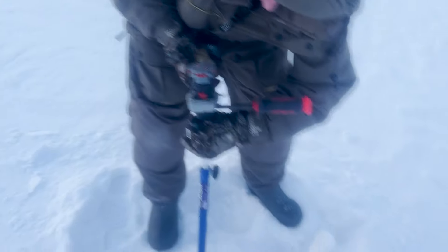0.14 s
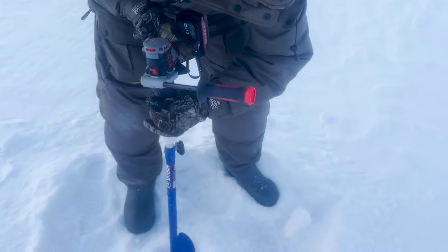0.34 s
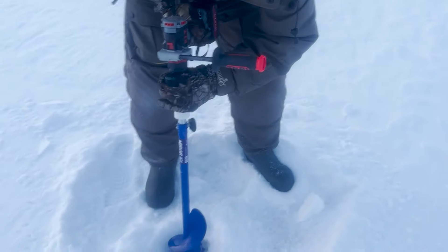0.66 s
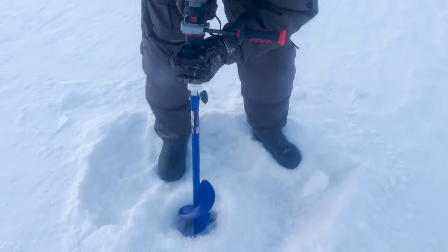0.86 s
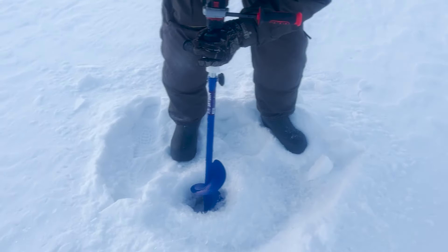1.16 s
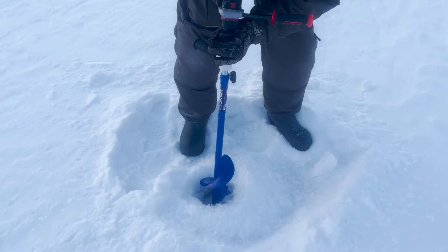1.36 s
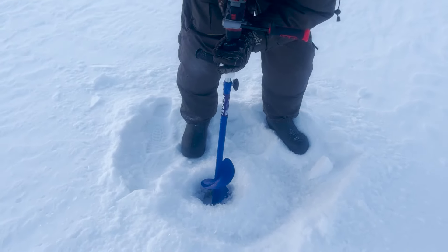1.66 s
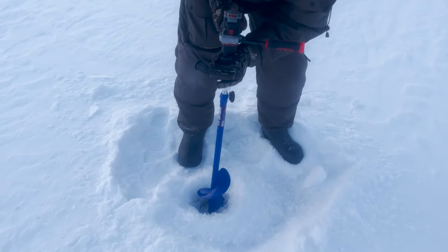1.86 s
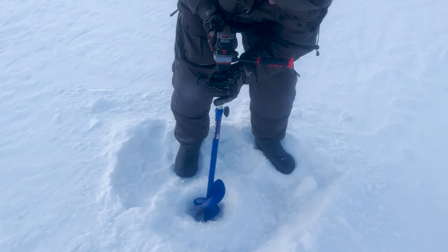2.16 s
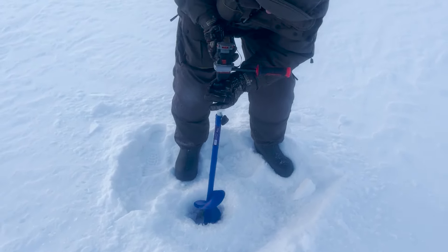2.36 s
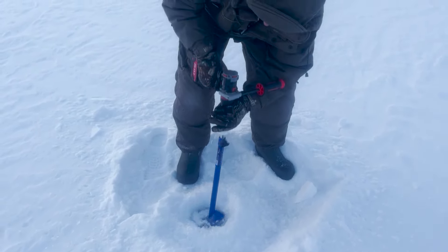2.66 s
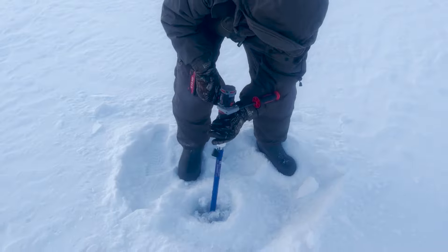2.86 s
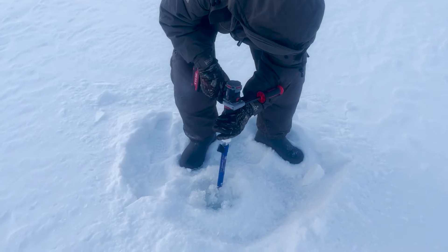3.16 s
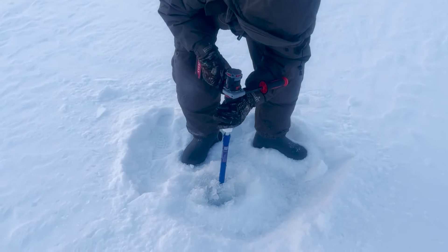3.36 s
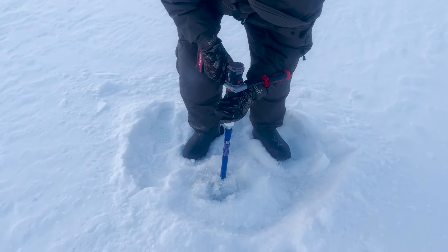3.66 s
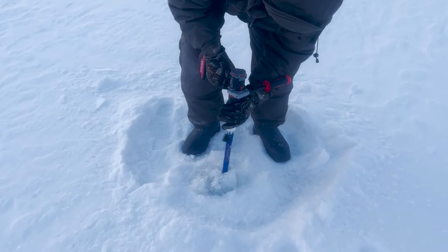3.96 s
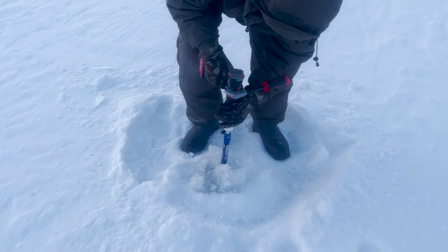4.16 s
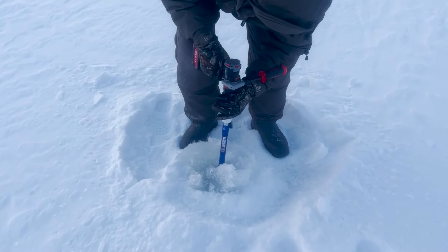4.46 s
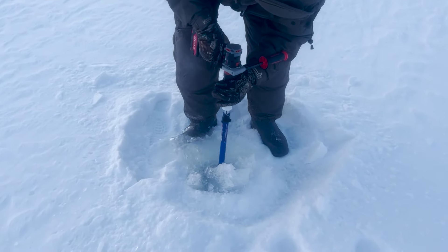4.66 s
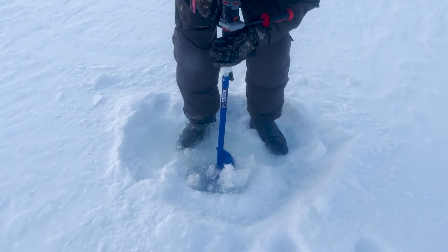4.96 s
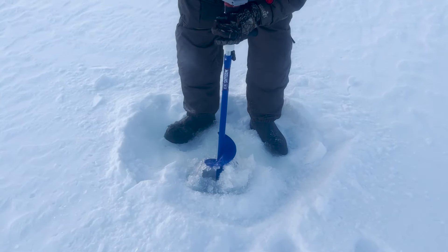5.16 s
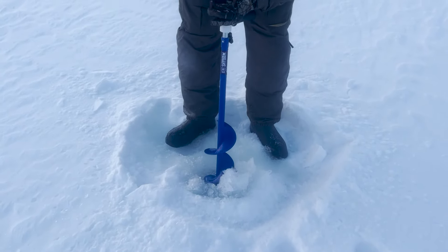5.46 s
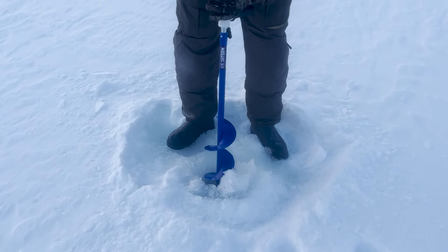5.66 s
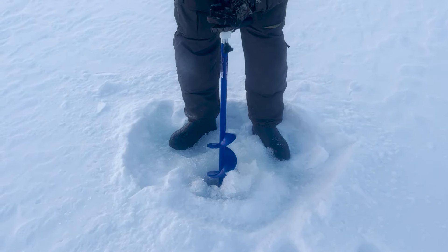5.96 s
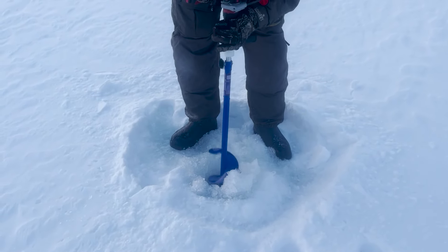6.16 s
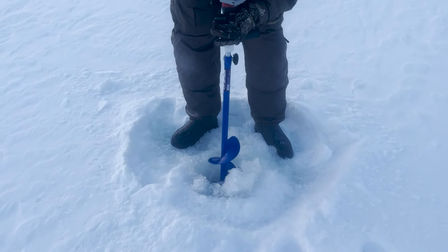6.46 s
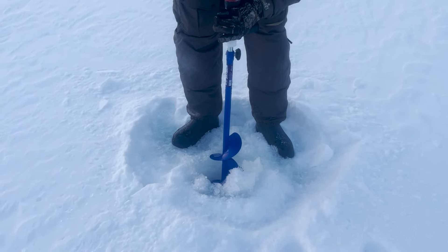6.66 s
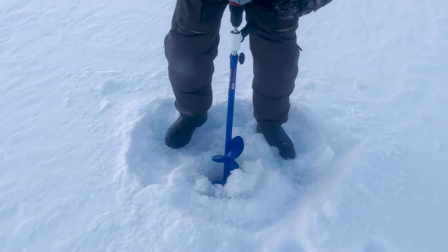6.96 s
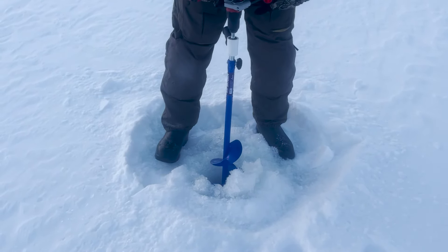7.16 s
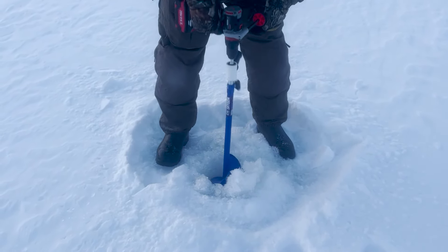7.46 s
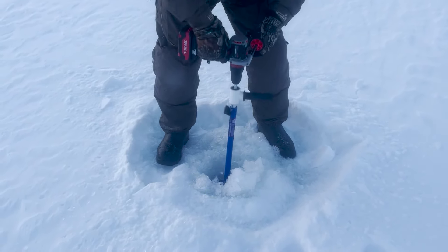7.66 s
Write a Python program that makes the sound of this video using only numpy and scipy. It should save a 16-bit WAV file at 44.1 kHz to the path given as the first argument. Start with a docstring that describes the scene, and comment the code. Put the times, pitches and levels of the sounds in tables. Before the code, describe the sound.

A cordless drill turns an auger into snow-covered ice in five bursts, the first already running at the start. Its high whine dips as the blades catch, with brittle crunching and hollow knocks from the hole. Between bursts come cloth and snow rustles, small ticks and a metallic clack. Low wind gusts and thumps buffet a close stereo microphone in a dry open place.

```python
"""Hand auger drilling lake ice

A cordless drill drives an auger into snow-covered ice in five short bursts, the first already under way.
Commutation pulses excite a housing resonance, and the whine sags as the load rises and the blades catch.
Random fractures make the ice crunch and excite the modes of the hole; shavings and cloth rustle in fine grains.
Low-frequency gusts and short eddy knocks buffet a two-port microphone in the open air."""
import sys
import numpy as np
from scipy import signal
from scipy.fft import rfft, irfft, next_fast_len
from scipy.io import wavfile

SR = 44100
rng = np.random.default_rng(int(sys.argv[2]) if len(sys.argv) > 2 else 0)


def wrap_up_sound(samples):
    """Save the sound to the file named by the first command line argument, as 16-bit audio."""
    columns = np.atleast_2d(samples).T
    # keep every value between -1 and 1, then stretch to whole-number steps
    tamed = np.clip(columns, -1, 1)
    steps = np.round(tamed * 32767).astype(np.int16)
    wavfile.write(sys.argv[1], SR, steps)


N = 344729
TIME = np.arange(N) / SR


def from_db(db):
    """Logarithmic level: 20 dB is a tenfold amplitude."""
    return 10 ** (np.asarray(db) / 20)


def rms_one(x):
    """Normalization to unit root-mean-square amplitude."""
    return x / np.sqrt(np.mean(x ** 2) + 1e-20)


def in_time(rows):
    """Linear interpolation: the columns of a curve at every sample."""
    s, *columns = np.transpose(rows)
    return [np.interp(TIME, s, c) for c in columns]


def at_hz(points, hz):
    """Interpolation of a spectrum on a log-frequency axis."""
    f, value = np.transpose(points)
    return np.interp(np.log(hz + 1), np.log(f), value)


def colour(x, spectrum):
    """Spectral shaping of a noise by multiplication in the frequency domain; rms 1."""
    size = next_fast_len(N)
    gain = from_db(at_hz(spectrum, np.fft.rfftfreq(size, 1 / SR)))
    return rms_one(irfft(rfft(x, size) * gain, size)[:N])


def band(x, low_hz, high_hz):
    """Band limiting by a second-order Butterworth design."""
    sections = signal.butter(2, [low_hz, min(high_hz, 20000)], "band", fs=SR, output="sos")
    return signal.sosfilt(sections, x + 1e-18)


def drift(rate):
    """Low-passed random modulation of unit rms, changing about `rate` times a second."""
    # filtered at a twentieth of the sample rate; the first 2000 values let the filter settle
    r = np.exp(-40 * np.pi * rate / SR)
    slow = signal.lfilter([1], [1, -2 * r, r * r], rng.standard_normal(N // 20 + 2002))[2000:]
    return np.interp(np.arange(N) / 20, np.arange(len(slow)), rms_one(slow))


def resonate(x, hz, width_hz):
    """Second-order resonance with about unit gain at its peak."""
    r = np.exp(-np.pi * width_hz / SR)
    zeros = np.array([1, 0, -1]) * (1 - r * r) / 2
    poles = [1, -2 * r * np.cos(2 * np.pi * hz / SR), r * r]
    return signal.lfilter(zeros, poles, x + 1e-18)


def gliding_resonance(x, hz, width_hz):
    """Heterodyne resonance: a one-pole low-pass in a frame that turns with the moving centre."""
    turn = np.exp(2j * np.pi * np.cumsum(hz) / SR)
    r = np.exp(-np.pi * width_hz / SR)
    return 2 * np.real(turn * signal.lfilter([1 - r], [1, -r], x / turn))


def ring(x, modes):
    """Modal superposition: a struck body as resonances in parallel."""
    # a 60 dB decay time sets the width of each mode
    return sum(from_db(db) * resonate(x, hz, np.log(1000) / (np.pi * t60)) for hz, db, t60 in modes)


def swells(events, rise_s, fall_s):
    """Transient envelope: each event rises and decays exponentially."""
    out, age = np.zeros(N), TIME[:SR // 4]
    shape = (1 - np.exp(-age / rise_s)) ** 2 * np.exp(-age / fall_s)
    for s, db in events:
        at = max(int(s * SR), 0)
        out[at:at + len(age)] += from_db(db) * shape[:N - at] / shape.max()
    return out


def holds(events, rise_s, fall_s):
    """Sustained envelope: each event ramps up, holds until its length is over and decays exponentially."""
    out = np.zeros(N)
    for s, length, db in events:
        rise = np.clip((TIME - s) / rise_s, 0, 1)
        fall = np.exp(-np.maximum(TIME - s - length, 0) / fall_s)
        out += from_db(db) * rise * fall
    return out


def grains(per_s, spread_db):
    """Impulsive noise: tiny events at random moments, with random signs and exponentially spread dB; rms 1."""
    sizes = from_db(spread_db * np.minimum(rng.exponential(1, N), 4)) * rng.choice([-1, 1], N)
    return rms_one(sizes * (rng.random(N) < per_s / SR))


# relative noise spectrum of the still air and of the breaking ice: frequency_hz, density_db [per Hz]
CRUNCH_SPECTRUM = [(150, -62), (300, 3), (600, 0.5), (1500, 3), (2200, -2), (3500, -4.5), (5000, -6.5),
                   (8000, -11), (12500, -12.5), (14200, -19), (15500, -39)]


def still_air():
    """Diffuse background: independent steady noise on each side."""
    return from_db(-61) * np.array([colour(rng.standard_normal(N), CRUNCH_SPECTRUM) for side in range(2)])


# gust level over time, before a small trim: start_s, level_db
WIND = [(0, -27.5), (.35, -31), (.7, -39), (.98, -37.5), (1.07, -49), (1.3, -41), (1.8, -43), (2.0, -40),
        (2.35, -53), (3.4, -38), (3.65, -47), (4.27, -38), (4.7, -51), (5.4, -48.5), (6.8, -42),
        (7.05, -47), (7.55, -39), (7.82, -44)]
# relative spectrum of the turbulence: frequency_hz, density_db [per Hz]
RUMBLE_SPECTRUM = [(20, -39), (45, 2), (70, 5), (130, 2.5), (220, -2.5), (350, -10), (550, -21),
                   (1000, -36), (2000, -47)]
# single buffets, relative levels: start_s, knock_level_db, knock_pitch_hz, puff_level_db
BUFFETS = [(.076, -15.5, 280, -26), (.103, -7.5, 310, -26), (.121, -11, 280, -31), (.25, -28, 200, -27),
           (.371, -13.5, 260, -25), (.45, -26, 350, -38), (.484, -14.5, 380, -35), (.52, -13.5, 340, -31),
           (.79, -25, 330, -35), (.849, -25, 300, -37), (.878, -23, 320, -37), (1.25, -19, 300, -32),
           (1.37, -30, 220, -35), (1.487, -19, 290, -33), (1.595, -27, 260, -31), (1.68, -25, 290, -36),
           (1.962, -33, 300, -34), (2.86, -27, 260, -33), (3.048, -20, 260, -33), (3.27, -30, 220, -36),
           (4.022, -19.5, 280, -36), (4.21, -24, 260, -35), (6.39, -32, 200, -38), (6.661, -24, 300, -35),
           (6.78, -32, 200, -38), (7.183, -13, 430, -33), (7.424, -15, 350, -31), (7.535, -22, 320, -33)]


def wind():
    """Turbulent pressure: a steady rumble, gusts nearly alike at both ports and short, dull eddy knocks."""
    wind_db, = in_time(WIND)
    shared, apart = [colour(rng.standard_normal(N), RUMBLE_SPECTRUM) for draw in range(2)]
    turbulence = shared + from_db(-21) * apart * np.array([[1], [-1]])
    s, knock_db, knock_hz, puff_db = np.transpose(BUFFETS)
    puffs = swells(zip(s, puff_db), rise_s=.015, fall_s=.03)
    gustiness_db = 2 * drift(18)
    gusts = np.hypot(from_db(wind_db - 1 + gustiness_db), puffs) * turbulence
    steady = from_db(-52) * rms_one(band(rng.standard_normal(N), 43, 84))
    # the pitch of an eddy is unsteady
    eddy_hz = np.interp(TIME, s, knock_hz) * np.exp(.3 * drift(393))
    eddy = np.sin(2 * np.pi * np.cumsum(eddy_hz) / SR) + .29 * rng.standard_normal(N)
    knocks = eddy * swells(zip(s, knock_db), rise_s=.0011, fall_s=.0048)
    return steady + gusts + from_db(-2) * band(knocks, 140, 800)


# boots, sleeves and loose shavings shift, relative levels: start_s, length_s, cloth_level_db, snow_level_db
SHUFFLES = [(0, .33, -50, -43), (.36, .38, -55.5, -49), (.76, .24, -54, -47), (1.04, .16, -62, -54),
            (1.22, .25, -57, -49.5), (1.49, .14, -55, -50), (1.79, .1, -62, -64), (2.04, .09, -68, -54),
            (2.18, .24, -59, -47), (2.43, .08, -50, -37), (3.2, .16, -54, -48), (3.44, .13, -50, -47),
            (3.58, .2, -56, -48), (4.71, .21, -52, -35), (4.95, .4, -52, -39), (5.4, .1, -54, -46),
            (5.57, .22, -59, -48), (6.42, .12, -53, -35.5), (6.6, .32, -56, -52), (6.95, .26, -52, -47)]
SHUFFLE_RISE_S, SHUFFLE_FALL_S = .03, .04
# relative spectrum of the rubbing: frequency_hz, density_db [per Hz]
FABRIC_SPECTRUM = [(1200, 1), (2500, 3.5), (4000, 1), (6000, 0), (9000, -0.5), (12500, 1.5), (14500, -2),
                   (15800, -12)]


def rustle():
    """Friction noise: dry snow and stiff cloth rub in fine, patchy grains."""
    cloth = [(s, length, db) for s, length, db, _ in SHUFFLES]
    rubbing = from_db(-70) + holds(cloth, SHUFFLE_RISE_S, SHUFFLE_FALL_S)
    fibres = grains(per_s=12000, spread_db=2)
    return rubbing * from_db(2.1 * drift(22)) * colour(fibres, FABRIC_SPECTRUM)


# ice crumbs and fittings tick: start_s, level_db [relative]
TICKS = [(1.2263, -29.5), (1.25, -26), (1.807, -30), (2.002, -34), (2.1785, -31), (5.0065, -26),
         (5.407, -26), (5.577, -34), (5.716, -35), (6.5111, -29), (6.7006, -28)]


def ticks():
    """Impact noise: dry, bright snaps with a short grainy tail."""
    snap = swells(TICKS, rise_s=.0002, fall_s=.003)
    return from_db(-6.5) * band(snap * rng.standard_normal(N), 750, 7500)


# the chuck takes up its play, and the braking motor rings briefly at the end: start_s, level_db [relative]
CLACKS = [(2.2682, -25), (3.205, -19), (3.77, -17), (3.81, -17), (4.218, -8), (4.7694, -22), (5.8441, -23),
          (7.2666, -14.5), (7.803, -9)]
# modes rung by the clacks: frequency_hz, level_db [relative], t60_s
CLACK_MODES = [(700, -23, .06), (1050, -31, 0.09), (1540, -29, 0.089), (2440, -16, .05), (2686, 6.5, 0.022),
               (2800, -22, 0.11), (3200, -13, .05), (4900, -17.5, 0.01)]
# the auger shaft jolts in its coupling: start_s, level_db [relative]
JOLTS = [(1.806, -35), (7.257, -18), (7.33, -21.5)]
# modes of the shaft: frequency_hz, level_db [relative], t60_s
SHAFT_MODES = [(716, -0.5, .07), (960, -3.5, .13), (1114, -2, 0.078), (1325, -2.5, 0.051), (1556, -4, .1)]


def clacks_and_jolts():
    """Modal excitation: short noise bursts ring the chuck, the shaft and, at the end, the braking motor."""
    clack = swells(CLACKS, rise_s=.0006, fall_s=.008) * rng.standard_normal(N)
    jolt = swells(JOLTS, rise_s=.00033, fall_s=.012) * rng.standard_normal(N)
    clatter = from_db(-23) * band(clack, 900, 9900)
    return from_db(3) * ring(clack, CLACK_MODES) + clatter + from_db(16.5) * ring(jolt, SHAFT_MODES)


def lumps(per_s, cycles):
    """Size and pitch: clusters of tumbling ice lumps, each with a short ring at its own pitch; rms 1."""
    pitches = np.geomspace(620, 2100, 16)
    total = np.zeros(N)
    for hz in pitches:
        impacts = grains(per_s / len(pitches), spread_db=3.5) * from_db(5.4 * drift(9.5))
        total += resonate(impacts, hz, hz / cycles) / hz ** .69
    return rms_one(total)


# the blades catch, the motor sags and the ice breaks: start_s, length_s, sag_hz, crunch_level_db [relative]
CATCHES = [(.128, .019, 180, -45), (.199, .012, 167, -45), (.255, .025, 201, -42), (2.515, .02, 33, -27),
           (2.574, .035, 300, -18.5), (2.655, .069, 106, -31), (2.706, .03, 742, -40),
           (2.795, .025, 620, -25), (2.919, .125, 115, -45), (4.021, .014, 172, -37),
           (4.144, .056, 104, -45), (4.317, .01, 147, -42), (4.441, .011, 53, -48), (4.528, .041, 114, -48),
           (4.638, .044, 133, -48), (5.952, .046, 110, -19.5), (6.037, .042, 577, -19.5),
           (6.086, .025, 100, -18), (6.209, .031, 229, -15.5), (6.275, .023, 198, -20),
           (6.35, .05, 200, -28), (7.47, .022, 72, -33), (7.598, .018, 216, -28), (7.66, .019, 123, -35)]
# chips break off, lumps drop and the shaft clanks once, near 7.61 s: start_s, level_db [relative]
IMPACTS = [(2.532, -7), (2.57, -7), (2.61, -14.5), (4.83, -22), (4.853, -22), (4.952, -26), (5.977, -14),
           (6.044, -19), (6.08, -9), (6.111, -12), (6.359, -18), (6.512, -16), (6.54, -20), (7.614, -7),
           (7.697, -12)]
# resonance of the hole over time: start_s, resonance_hz, boost_db [relative]
HOLE = [(2.2, 600, -2), (2.52, 228, -4), (2.6, 230, -13), (3.1, 235, 4), (4.25, 235, 1), (4.65, 330, -6),
        (4.9, 460, 1), (5.35, 520, 5), (6.0, 564, 8), (6.28, 490, -1), (6.55, 524, 11), (6.7, 400, -4),
        (7.35, 670, -12), (7.6, 700, 9)]
# modes of the hole: multiple_of_resonance, width_hz [of each of two passes], level_db [relative]
HOLE_MODES = [(0.999, 96, 4.5), (1.17, 87, -3.5), (2.1, 147, -11.5), (2.85, 127, -15)]


def ice(scrape):
    """Brittle fracture: cracks cluster under the blades, lumps tumble and impacts ring the hole's modes."""
    breaking = holds([(s, length, db) for s, length, _, db in CATCHES], rise_s=.015, fall_s=.035)
    snow = [(s, length, db) for s, length, _, db in SHUFFLES]
    shifting = holds(snow, SHUFFLE_RISE_S, SHUFFLE_FALL_S)
    force = np.sqrt(scrape ** 2 + breaking ** 2 + shifting ** 2)
    clumps = grains(per_s=4000, spread_db=2) * from_db(3.03 * drift(57))
    fractures = rms_one(clumps + .5 * rng.standard_normal(N))
    chunks = grains(per_s=130, spread_db=2)
    impacts = swells(IMPACTS, rise_s=.0005, fall_s=.006) * rng.standard_normal(N)
    crunch = from_db(-2.5) * force * colour(fractures, CRUNCH_SPECTRUM) + from_db(-8) * band(impacts, 290, 2500)
    tumble = from_db(-3) * force * lumps(per_s=560, cycles=20)
    hole_hz, hole_db = in_time(HOLE)
    knocks = from_db(hole_db + 13) * force * (chunks + .15 * fractures) + from_db(8.5) * impacts
    # the narrow bore lets little through between its modes, so each filters twice
    hollow = np.zeros(N)
    for multiple, width_hz, db in HOLE_MODES:
        once = gliding_resonance(knocks, multiple * hole_hz, width_hz)
        hollow += from_db(db) * gliding_resonance(once, multiple * hole_hz, width_hz)
    return crunch + tumble + hollow


# one row a pull of the trigger; pitches are under load before any catch, levels relative:
# trigger_s, blades_meet_ice_s, release_s, coasting_time_s, first_pitch_hz, release_pitch_hz,
# torque_level_db, scrape_level_db, drill_level_db, left_minus_right_db
BURSTS = [(-.298, -.298, .268, .092, 2575, 3000, -4.5, -46, -.5, -5),
          (2.277, 2.515, 3.138, .09, 2714, 2742, -2.7, -37.5, 0, -.5),
          (3.762, 3.762, 4.697, .09, 2625, 2850, -2.8, -37, -.3, .3),
          (5.84, 5.84, 6.347, .11, 2724, 2867, -5.5, -28, 2.3, 1),
          (7.256, 7.256, 7.748, .12, 2796, 3166, -1.5, -29.5, -1, 0)]
FREE_HZ = 3280  # commutation pitch with no load
SPIN_UP_S, RECOVER_S = .171, .054  # time scales of reaching speed and of recovering from a catch
ENGAGE_S, LET_GO_S = .02, .012  # the load comes on; the current dies
FULL_LOAD_HZ, INERTIA_HZ = 620, 2000  # sag at the current limit; load of spinning up, as a sag
TORQUE_POWER, SOFT_START_POWER = 1.7, 2.2  # whine grows with load; current rises with speed at the start
COAST_POWER, COAST_DB = 1.7, -24  # braking steepens; change of torque level while coasting


def motion():
    """Torque balance: load sags a spinning motor, which coasts to rest; pitch, torque, scraping, stereo gain."""
    sag = np.zeros(N)
    for s, length, hz, _ in CATCHES:
        recovery = np.exp(-np.maximum(TIME - s - length, 0) / RECOVER_S)
        sag += hz * np.clip((TIME - s) / length, 0, 1) * recovery
    pitch, torque_db, scrape, level_db, pan_db = np.zeros((5, N))
    for (trigger, meet, release, coast_s, first_hz, last_hz,
         burst_db, scrape_db, drill_db, side_db) in BURSTS:
        now = (TIME > trigger) & (TIME < release + coast_s)
        t = TIME[now]
        ramp = (t - trigger) / SPIN_UP_S
        spin = ramp / (1 + ramp ** 8) ** (1 / 8)  # nearly linear, then level at 1
        coast = 1 - np.clip((t - release) / coast_s, 0, 1) ** COAST_POWER
        loaded_hz = np.interp(t, [meet, meet + ENGAGE_S, release], [FREE_HZ, first_hz, last_hz])
        load = FREE_HZ - loaded_hz + sag[now]
        let_go = np.clip((t - release) / LET_GO_S, 0, 1)
        effort = np.clip((load + INERTIA_HZ * (1 - spin)) / FULL_LOAD_HZ, .02, 1)
        torque = effort ** TORQUE_POWER * spin ** SOFT_START_POWER
        pitch[now] = (FREE_HZ - load) * spin * coast
        torque_db[now] = burst_db + 20 * np.log10(torque) + COAST_DB * let_go
        engaged = np.clip((t - meet) / ENGAGE_S, 0, 1)
        scrape[now] = from_db(scrape_db) * engaged * spin ** 2 * (1 - let_go)
        level_db[now], pan_db[now] = drill_db, side_db
    gain = from_db(level_db + pan_db / 2 * np.array([[1], [-1]]))
    return pitch, torque_db, scrape, gain


# motor tones, growing with torque: multiple_of_pitch, level_db [relative]
MOTOR_TONES = [(.5, -19.5), (1, -12.5), (2, -18), (3, -28)]
# gear tones, growing with speed: multiple_of_pitch, level_db [relative]
GEAR_TONES = [(.5, -48), (1.441, -47), (1.62, -36), (1.808, -58), (2, -46), (2.518, -50.5), (3.24, -42.5)]
# relative spectrum of the gearbox hiss: frequency_hz, density_db [per Hz]
GEARBOX_SPECTRUM = [(150, 9), (700, -40), (1400, 3), (2000, 6), (3300, 2), (4600, 6), (6200, 3), (8800, 2),
                    (10200, -4), (12500, -1.5), (14200, -8), (15000, -38)]
HOUSING_HZ, HOUSING_WIDTH_HZ = 2636, 283


def drill(pitch, torque_db):
    """Forced resonance: commutation pulses ring the housing; gears add tones and hiss that grow with speed."""
    running = pitch > 0
    speed = pitch / HOUSING_HZ
    slack = np.clip(1 - speed, 0, 1)  # a slow motor runs unevenly and lets its gears rattle
    # under load the speed flutters once per turn of the planet carrier
    carrier = 2 * np.pi * np.cumsum(pitch) / SR / 66
    flutter = from_db(torque_db / 2) * (.006 * drift(4) * np.sin(carrier) + .003 * drift(45))
    unevenness = .0278 * slack * drift(214)
    phase = 2 * np.pi * np.cumsum(pitch * (1 + flutter + unevenness)) / SR
    # faint lines stand at multiples of the rotor rate, six commutations to a turn
    turn = phase / 6
    orders = sum(from_db(7.9 * drift(5)) * np.sin(k * turn + .5 * drift(40)) for k in range(7, 22))
    pulses = np.sqrt(2) * sum(from_db(db) * np.sin(k * phase) for k, db in MOTOR_TONES)
    pulses = pulses * from_db(torque_db + drift(68)) * (1 - slack ** 2)
    chatter_level = from_db(-33.5) + from_db(torque_db / 2 - 13) * slack
    chatter = running * chatter_level * grains(per_s=2700, spread_db=6)
    rattle = running * from_db(torque_db / 2 - 27) * slack * orders
    whine = resonate(pulses + chatter + rattle, HOUSING_HZ, HOUSING_WIDTH_HZ)
    # uneven teeth make each gear tone waver in level and phase
    mesh = np.sqrt(2) * sum(from_db(db + 2.95 * drift(32)) * np.sin(k * phase + .6 * drift(74))
                            for k, db in GEAR_TONES)
    freedom = from_db(-.5 * np.clip(torque_db, -10, 0) - 6)  # lightly loaded gears sing more
    teeth = grains(per_s=14000, spread_db=0) * (1 + .2 * np.sin(turn))
    hiss = from_db(-35) * colour(teeth, GEARBOX_SPECTRUM) * from_db(drift(48))
    gears = mesh * freedom * speed ** 3 + (hiss + from_db(-54.5) * orders) * speed ** .97
    return running * (whine + gears)


def snow_scatter(work):
    """Diffuse reflection: snow returns only a short, noisy scatter, different on each side."""
    age = TIME[:SR // 25]
    response = rng.standard_normal((2, len(age))) * np.exp(-age / .014)
    response = response / np.linalg.norm(response, axis=1, keepdims=True)
    return from_db(-19) * signal.fftconvolve(work, response, axes=1)[:, :N]


# phase between the two ports: frequency_hz, left_lead_rad
PORT_PHASE = [(0, 0), (200, 0), (600, -.8), (1000, -.3), (1750, 0), (2550, 2), (3000, .7), (3400, 1.9),
              (4300, 1.6), (4900, .8), (6000, 3.14), (7700, 6.2), (8300, 6.4), (10000, 9.42), (11900, 12.4),
              (13000, 12.7), (14200, 15.7)]
# level between the two ports: frequency_hz, left_minus_right_db
PORT_BALANCE = [(200, 1), (580, -7), (950, -.3), (2000, -1), (2550, 2.5), (2720, -1), (2850, -2.5),
                (3200, -5.5), (4300, -7), (5800, -0.5)]


def ports(x):
    """Interaural-style differences: two spaced ports differ in phase and level at each frequency."""
    size = next_fast_len(N + SR // 10)
    hz = np.fft.rfftfreq(size, 1 / SR)
    lead = np.interp(hz, *np.transpose(PORT_PHASE))
    tilt = from_db(at_hz(PORT_BALANCE, hz) / 2)
    response = np.array([tilt, np.exp(-1j * lead) / tilt])
    return irfft(rfft(x, size) * response, size)[:, :N]


def scene():
    """Superposition: the work passes the ports; faint scatter, wind and still air are added."""
    pitch, torque_db, scrape, gain = motion()
    motor = gain * drill(pitch, torque_db)
    work = motor + clacks_and_jolts() + ice(scrape) + rustle() + ticks()
    return ports(work) + snow_scatter(work) + wind() + still_air()


def record(dry):
    """Band limitation: an elliptic low-pass cuts the top steeply at 15.8 kHz."""
    return signal.sosfilt(signal.ellip(10, .1, 90, 15800, fs=SR, output="sos"), dry)


dry = scene()
out = record(dry)
wrap_up_sound(out)
```